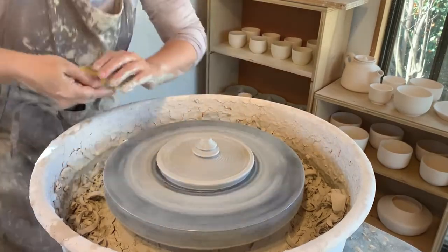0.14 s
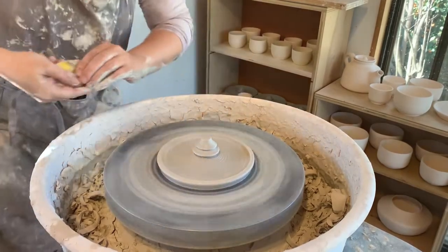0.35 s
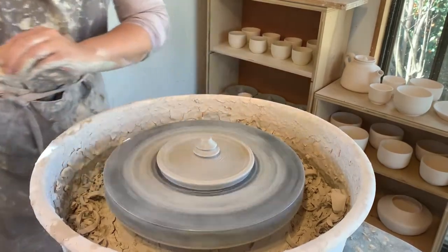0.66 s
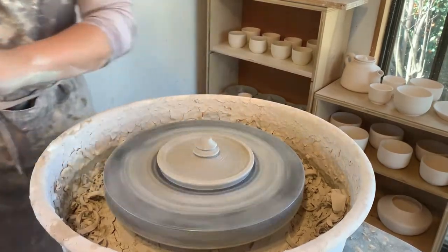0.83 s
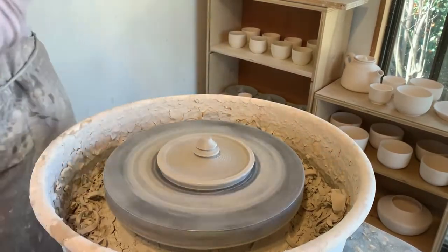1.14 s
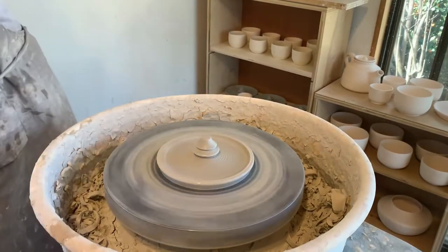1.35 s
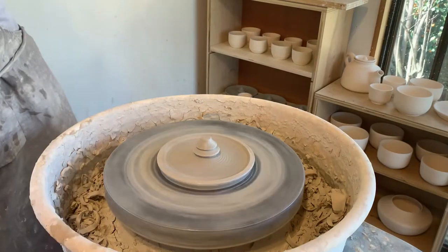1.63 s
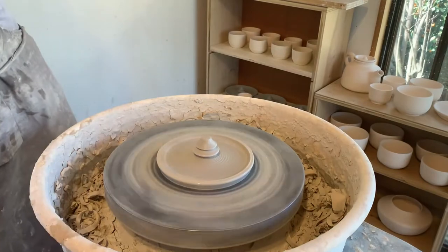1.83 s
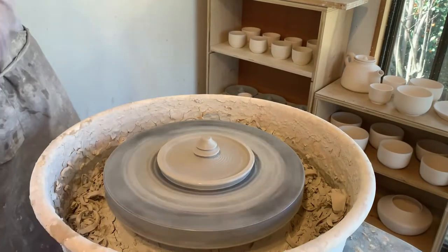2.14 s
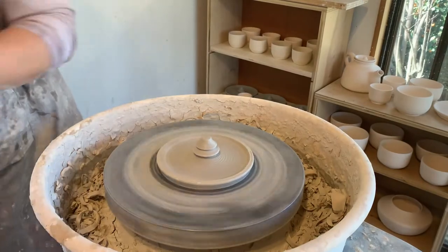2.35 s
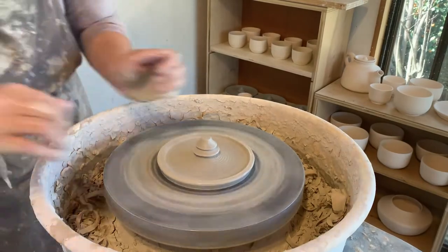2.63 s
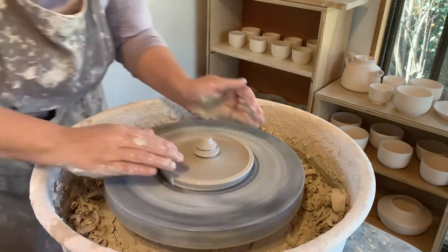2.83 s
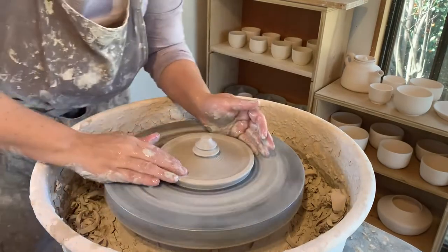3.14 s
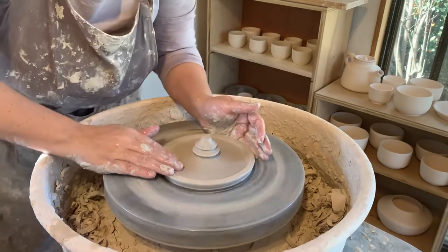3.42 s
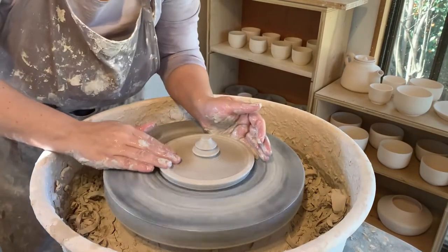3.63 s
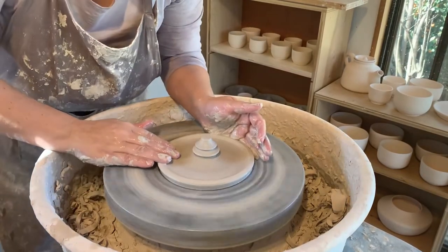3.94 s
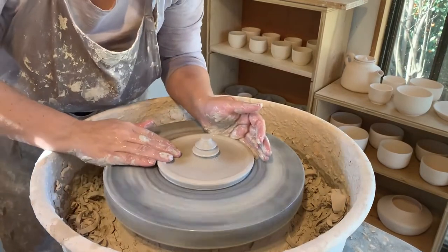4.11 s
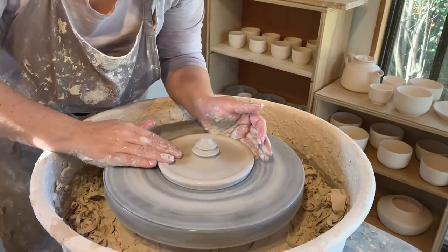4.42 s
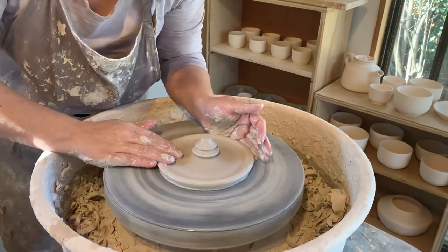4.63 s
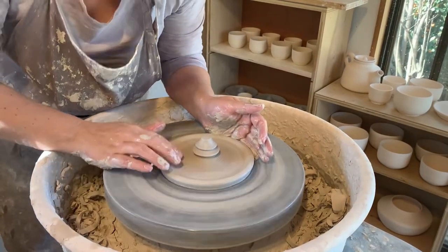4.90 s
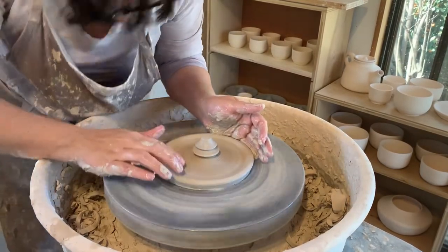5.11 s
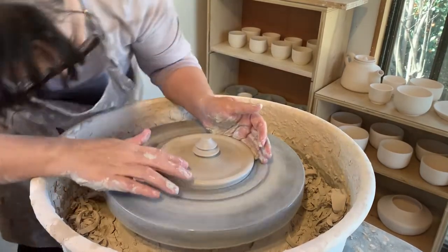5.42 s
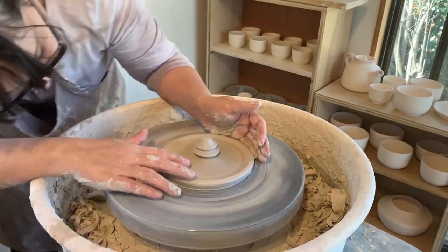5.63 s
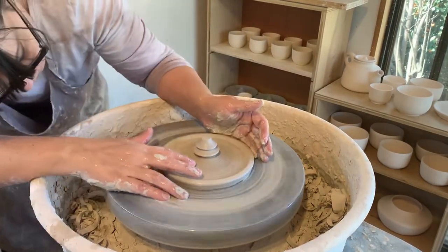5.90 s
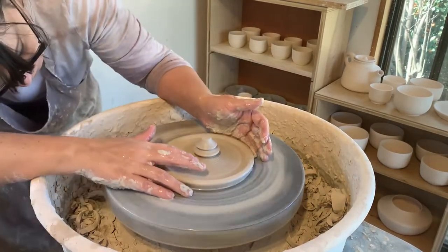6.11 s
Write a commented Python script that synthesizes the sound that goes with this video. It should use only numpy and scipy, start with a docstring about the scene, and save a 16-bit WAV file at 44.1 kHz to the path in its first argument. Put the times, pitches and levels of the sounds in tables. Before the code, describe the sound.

From 0 to about 6.3 seconds an electric pottery wheel runs without stopping in a small, fairly dry studio, heard close in stereo and slightly heavier on the left. A low motor hum near 120 Hz carries a rough drone that flutters about nine times a second, with dull rattling whirr in the low mids. Soft uneven bearing rush, thin high hiss and faint steady whines lie over it. A breathy whistle near 3 kHz swells around 0.3, 0.8, 1.8 and 2.1 seconds, most clearly at 2.7, then weakly at 3.5 and again at 4.8. A barely audible tick comes at 1.1; small knocks and clicks with short damped rings cluster from 1.6 to 2.0, and a sharp bright snap falls at 2.6, with a fainter tick just after. The hum sags slightly near 3.3, then the drone's upper tones grow a little stronger after 5.5. It ends still running.

```python
"""A throbbing drone comes first: an electric pottery wheel running in a small studio, heard by a stereo pair.
Its drive repeats nine times a second, giving close lines at every multiple of that rate over the motor's mains hum.
Uneven bearing rush, thin hiss and steady whines lie on top, and a breathy whistle surges at times.
The potter's few faint handling clicks are short bright snaps with damped rings and a little room."""
import sys
import numpy as np
from scipy import signal
from scipy.fft import rfft, irfft
from scipy.io import wavfile

SR = 44100
rng = np.random.default_rng(int(sys.argv[2]) if len(sys.argv) > 2 else 0)


def put_to_file(sound):
    """Save the sound as 16-bit audio at rate SR, in the file named by the first command-line argument."""
    columns = np.atleast_2d(sound).T  # one column per channel
    safe = np.clip(columns, -1, 1)
    whole_steps = np.round(safe * 32767)
    wavfile.write(sys.argv[1], SR, whole_steps.astype(np.int16))


N = 276066
TIME = np.arange(N) / SR   # s
BIN_HZ = np.arange(N // 2 + 1) * SR / N   # frequencies of a full-length spectrum

TURN_HZ, MAINS_HZ = 9.0025, 59.975

# Drive lines that beat with the strongest hum tone.
# Each row: multiple of the turning rate, time in seconds at which line and hum swell together.
BEATS = [(13, 0.23), (14, 0.123)]
# Balance of the stereo pair. Each row: frequency in Hz, left-right difference in dB.
BALANCE = [(60, 3.3), (120, 2), (240, 1.5), (480, 1), (950, 2), (1890, 2), (3770, 0.5), (7520, -1.5),
           (15000, 9)]


def from_db(db):
    """Decibels to gain."""
    return 10 ** (np.asarray(db) / 20)


def at_hz(points, hz):
    """Read a table on a log-frequency axis."""
    points = np.array(points)
    return np.interp(np.log(np.maximum(hz, 1)), np.log(points[:, 0]), points[:, 1])


def over_time(points):
    """Read a table of (seconds, value) at every sample."""
    return np.interp(TIME, *np.transpose(points))


def panned(pan_db):
    """Left and right gains for a level difference."""
    return from_db(np.array([[.5], [-.5]]) * pan_db)


def drift(rate):
    """Slow chance with a spread of 1, wandering about `rate` times a second."""
    step, size = 36, 8192   # samples between slow values, number of slow values
    hz = np.arange(size // 2 + 1) * SR / (step * size)
    smoothing = 1 / (1 + (hz / rate) ** 2) ** 2
    slow = irfft(rfft(rng.standard_normal(size)) * smoothing, size)
    return np.interp(np.arange(N) / step, np.arange(size), slow / slow.std())


def white(count):
    """Spectra of unrelated noises with unit power per Hz."""
    return rfft(rng.standard_normal((count, N))) * np.sqrt(SR / 2)


def turn_angle():
    """How far the drive is into its present turn, 0-1."""
    # The drive gains a little while it runs free and falls back under the hands.
    # Each row: time in seconds, lead over a steady turn in seconds.
    lead = [(0, -.00026), (1.2, -.0001), (3.2, .0003), (3.8, .00018), (5, -.00014), (6.2, -.00018)]
    return TURN_HZ * (TIME + over_time(lead)) % 1


def swell(depth_db):
    """A gain that peaks at one point of every turn."""
    peak_s = 0.044   # into the turn
    return from_db(depth_db * np.cos(2 * np.pi * (turn_angle() - peak_s * TURN_HZ)))


def looped(lines):
    """Play one turn, given by its lines, over and over at the speed of the drive."""
    one_turn, angle = irfft(lines), turn_angle()
    size = one_turn.shape[1]
    places = np.arange(size + 1) / size
    # the first sample is repeated at the end so that the turn closes
    channels = [np.interp(angle, places, np.append(channel, channel[0])) for channel in one_turn]
    return np.array(channels) * size / np.sqrt(2)   # a line of level 1 has rms 1


def drive(scatter_from_hz=365, scatter_width_hz=25, stereo_scatter_hz=750, uneven_db=2.0, swell_db=0.3,
          loose_db=-8, flutter_db=0.27, whirr_waver_db=1.07, direct_share=0.71):
    """Bumps, rattles and roughness repeat every turn, which gives lines at multiples of the turning rate."""
    # Lines set one by one. Each row: multiple of the turning rate, level in dB rms before balance and sway.
    single_lines = [(7, -36.4), (8, -36.2), (12, -51.6), (15, -49.8), (17, -62), (22, -44.7), (23, -40.6),
                    (24, -45.6), (25, -47.2), (26, -50), (27, -40.5), (28, -49), (29, -36), (30, -47),
                    (31, -48), (32, -41.8), (35, -40.7), (36, -48), (38, -62), (41, -52), (42, -42.7),
                    (43, -50.6), (44, -50.5), (45, -47.9), (48, -53), (55, -55.5), (58, -55.3), (67, -54.6),
                    (68, -68), (69, -54.3), (70, -55.5), (71, -56), (72, -54.2), (81, -60), (82, -62.5),
                    (88, -62.5), (104, -61), (109, -66.5), (135, -57.8), (137, -59.5), (139, -70),
                    (140, -58), (142, -63), (143, -55), (144, -59), (164, -64), (165, -63), (196, -68),
                    (200, -67.5), (202, -67), (263, -70), (266, -66), (267, -69.5), (340, -72.5),
                    (343, -73)]
    # All other lines, read from a spectrum.
    # Each row: frequency in Hz, level in dB rms per line before unevenness, balance and sway.
    line_spectrum = [(28, -75), (45, -56), (54, -60), (81, -56), (170, -56), (190, -61), (300, -49.5),
                     (335, -57), (420, -53), (440, -66), (560, -63), (700, -62), (760, -65), (820, -74),
                     (900, -70), (1000, -72), (1090, -79), (1160, -74), (1220, -64), (1290, -64),
                     (1350, -67), (1430, -72), (1580, -73), (1680, -79), (1790, -73), (1950, -83),
                     (2100, -78), (2300, -80), (2400, -72), (2490, -81), (2600, -74), (2690, -81),
                     (2770, -76), (2850, -88), (3220, -80), (3320, -87), (3450, -81), (3700, -92)]
    # Bumps of the drive. Each row: seconds into the turn, strength in dB, push +1 or pull -1.
    bump_rows = [(0.0194, -3.3, 1), (0.0291, -4.5, -1), (0.0562, -5.6, -1), (0.0602, -2.4, 1),
                 (0.0776, -2.9, 1), (0.0965, -3.6, -1)]
    # Rattles of the frame, and the beads of the motor's gear whine near 1240-1290 Hz. # Each row: seconds into
    # the turn, pitch in Hz, strength in dB.
    rattle_rows = [(.008, 700, 0), (.015, 500, -2), (.017, 1270, 0), (.027, 1290, 0), (.030, 700, -2),
                   (.038, 1280, -1), (.041, 635, 3.5), (.048, 510, 0), (.050, 790, 0), (.053, 1260, 2),
                   (.053, 385, 2), (.070, 1290, -1), (.081, 400, 3), (.082, 520, -2), (.087, 630, -1),
                   (.097, 1240, 2)]
    # Lines that a standing wave makes louder on the left.
    # Each row: multiple of the turning rate, left-right difference in dB.
    one_sided = [(31, 9), (58, 16), (144, 7)]
    # The drone's weight sways between two groups. Each row: time in seconds, level of the upper lines in dB.
    sway = [(0, -1.9), (.8, 1), (2.1, 1.9), (2.7, 0), (3.7, -2.5), (5, -2), (5.7, 3.1), (6.2, 3.5)]
    rattle_width_hz, throb_dip_s = 34, 0.044
    upper_band_hz, lower_band_hz = (365, 425), (193, 220)
    lower_follows = -0.39   # the lower lines move the opposite way, by this share

    order = np.arange(4097)
    hz = order * TURN_HZ
    chance = rng.standard_normal((4, len(hz)))

    # low lines follow the bumps; higher ones follow the rattles and blur into a whirr of uneven lines
    smear = np.clip((hz - scatter_from_hz) / scatter_width_hz, 0, 1)
    unevenness_db = uneven_db * smear * np.clip(chance[2], -2, 1.5)
    level = from_db(at_hz(line_spectrum, hz) + unevenness_db)
    level = level * (hz > line_spectrum[0][0]) * (hz < line_spectrum[-1][0])
    stereo_scatter = np.minimum(hz / stereo_scatter_hz, 1) ** 2
    pan_db = at_hz(BALANCE, hz)
    for multiple, db in single_lines:   # these reach the microphones more directly
        level[round(multiple)] = from_db(db)
        stereo_scatter[round(multiple)] *= direct_share
    for multiple, db in one_sided:
        pan_db[round(multiple)] = db
    for multiple, _ in BEATS:   # these sound with the hum
        level[round(multiple)] = 0

    bumps = sum(sign * from_db(db) * np.exp(-2j * np.pi * hz * s) for s, db, sign in bump_rows)
    rattles = 0
    for s, pitch, db in rattle_rows:
        band = np.exp(-.5 * ((hz - pitch) / rattle_width_hz) ** 2)
        rattles = rattles + from_db(db) * band * np.exp(2j * np.pi * (rng.random() - hz * s))
    roughness = from_db(loose_db) * (chance[0] + 1j * chance[3])
    phase = np.angle((1 - smear) * bumps + smear * (rattles + roughness))
    # the deepest lines swell together and cancel once a turn
    throb_phase = np.pi * order - 2 * np.pi * hz * throb_dip_s
    phase = np.where(hz < 100, throb_phase, phase)
    # short waves reach the two microphones out of step
    phase = phase + np.array([[.5], [-.5]]) * chance[1] * stereo_scatter
    lines = level * panned(pan_db) * np.exp(1j * phase)

    # two groups of lines sway against each other; the whirr above them wavers
    lower, upper = [(hz > low) & (hz < high) for low, high in (lower_band_hz, upper_band_hz)]
    whirr = hz >= upper_band_hz[1]
    sway_db = over_time(sway)
    sound = looped(lines * ~(lower | upper | whirr))
    sound += looped(lines * lower) * from_db(lower_follows * sway_db)
    sound += looped(lines * upper) * from_db(sway_db)
    sound += looped(lines * whirr) * swell(swell_db) * from_db(whirr_waver_db * drift(3.5))
    return sound * from_db(flutter_db * drift(26))


def hum(right_lag_s=-0.001, beat_db=-18):
    """Motor iron hums at multiples of the mains; its strongest tone beats with two nearby drive lines."""
    # Magnetic hum. Each row: multiple of the mains, dB relative to the hum level, left-right difference in dB.
    partials = [(2, 0, 3), (3, -26, -4.5), (4, -14.5, -10), (8, -26, 11.5), (10, -29, 0), (20, -33, 0)]
    # The hum sags as the hands settle on the wheel. Each row: time in seconds, level in dB rms before panning.
    level_rows = [(0, -34), (1.3, -32.5), (2.4, -32), (3.3, -35), (4.3, -33.5), (6.2, -33.0)]
    mic_time = TIME - np.array([[0], [right_lag_s]])   # a negative lag puts the right ahead
    tones = []
    for multiple, db, pan_db in partials:
        cycles = round(multiple) * MAINS_HZ * mic_time + rng.random()
        tones.append(from_db(db) * panned(pan_db) * np.exp(2j * np.pi * cycles))
    # each beating line is the strongest tone shifted to a multiple of the turning rate
    beating = sum(np.exp(2j * np.pi * (multiple * TURN_HZ - 2 * MAINS_HZ) * (TIME - s)) for multiple, s in BEATS)
    tone_sum = sum(tones) + tones[0] * from_db(beat_db) * beating
    return np.sqrt(2) * np.imag(tone_sum) * from_db(over_time(level_rows))


def ripple(hz, spacing_hz=14):
    """Fine random unevenness across frequency, with a spread of about 1."""
    knots = np.arange(0, 4096) * spacing_hz
    return np.interp(hz, knots, rng.standard_normal(len(knots)))


def bearings(level_db=0, grain_db=0.5, ripple_db=2.68):
    """Rolling noise, coloured by peaks and dips across frequency, with a fine grain in time."""
    # Rush before peaks and dips. Each row: frequency in Hz, density in dB per Hz.
    rush_density = [(20, -94), (42, -70), (68, -63), (95, -76), (150, -69), (300, -68.5), (550, -73),
                    (850, -75.8), (1300, -77.3), (2000, -84.4), (2900, -86.5), (4000, -88.6), (5500, -95.6),
                    (7000, -95), (9000, -110)]
    # Peaks (+) and dips (-) in the colour of the rush; some peaks blur around drive lines.
    # Each row: centre in Hz, width in Hz, strength in dB.
    colour_peaks = [(320.2, 2, 13), (343, 25, -4), (378, 5, 8), (405, 14, 4), (450, 30, -3), (484, 20, 5),
                    (525, 10, 6), (565, 20, -4), (592, 16, 8), (625, 16, 8.5), (690, 40, -3), (755, 20, 3),
                    (925, 16, 6), (1028, 24, 6), (1090, 60, -4), (1205, 36, 3.5), (1288, 14, 8),
                    (1790, 36, 5), (1855, 36, 4.5), (2405, 50, 5), (2650, 120, 2), (2860, 110, -5),
                    (3105, 80, 6), (3450, 80, 2)]
    # Likeness of the rush at the two microphones. Each row: frequency in Hz, correlation.
    likeness = [(40, 1), (130, 1), (350, 0.81), (600, 0.083), (900, 0.35), (1800, 0.15), (5000, 0.027),
                (16000, 0.017)]
    peaks = 0
    for centre, width, db in colour_peaks:
        peaks = peaks + (from_db(db) ** 2 - 1) / (1 + (2 * (BIN_HZ - centre) / width) ** 2)
    colour = from_db(at_hz(rush_density, BIN_HZ)) * np.sqrt(np.maximum(1 + peaks, .1))
    alike = np.clip(at_hz(likeness, BIN_HZ), -1, 1)
    unevenness_db = ripple_db * np.array([ripple(BIN_HZ), ripple(BIN_HZ)])
    mid, side = white(count=2) * from_db(unevenness_db)
    stereo = (np.sqrt(1 + alike) * mid + np.sqrt(1 - alike) * side * [[1], [-1]]) / np.sqrt(2)
    rush = irfft(stereo * colour * panned(at_hz(BALANCE, BIN_HZ)), N)
    return rush * from_db(level_db + grain_db * drift(100))


def hiss(diffuse_db=-12, left_lag_s=.000182):
    """Motor hiss comes straight from one side, later at the left microphone, with a weaker diffuse part."""
    # Thin hiss of the motor, direct part. Each row: frequency in Hz, density in dB per Hz.
    hiss_density = [(4000, -115), (6600, -99), (7900, -104), (8900, -102), (9650, -90.5), (10200, -98),
                    (10750, -104), (11400, -100), (12800, -102), (15800, -103)]
    delay = np.exp(-2j * np.pi * BIN_HZ * np.array([[left_lag_s], [0]]))
    direct = white(count=1) * delay
    diffuse = from_db(diffuse_db) * white(count=2)
    return irfft((direct + diffuse) * from_db(at_hz(hiss_density, BIN_HZ)), N)


def wandering_tone(hz, width_hz, lag_s=0.00022):
    """A narrow tone of rms 1 whose pitch wanders, reaching one microphone a little later."""
    wander = np.cumsum(width_hz / 2 * drift(18.4)) / SR   # cycles
    mic_time = TIME - np.array([[0], [lag_s * rng.uniform(-0.84, 1)]])
    return np.sqrt(2) * np.sin(2 * np.pi * (hz * mic_time + wander))


def whistle(flutter_rate):
    """A narrow band of noise, breathy and fluttering, that surges now and then."""
    # Surges, each rising and falling like a bell. Each row: time of the top in seconds, rise in dB.
    surges = [(0.33, 8), (0.77, 9), (1.75, 7.5), (2.08, 8.5), (2.72, 13), (3.52, 3), (4.82, 7)]
    centre_hz, width_hz, surge_width_s = 3140, 12, .11
    resting_db, flutter_depth_db = -68, 2
    surge_db = sum(db * np.exp(-.5 * ((TIME - s) / surge_width_s) ** 2) for s, db in surges)
    flutter_db = flutter_depth_db * np.minimum(drift(flutter_rate), 2)
    noise = white(count=1) + white(count=2)   # partly shared by left and right
    narrow = irfft(noise / (1 + ((BIN_HZ - centre_hz) / width_hz) ** 2), N)
    return from_db(resting_db + surge_db + flutter_db) * narrow / narrow.std()


def whine(swell_db=2.1, flutter_rate=14):
    """The whistle above the motor's thin tones, each of which swells on its own."""
    # Thin tones of the motor. Each row: pitch in Hz, width in Hz, level in dB rms before swelling.
    whines = [(191.9, .3, -54), (238.7, .3, -56), (311.9, .3, -58), (318.6, .3, -50.5), (374.5, .3, -56),
              (649.7, .5, -56.5), (1577.9, .5, -68.5), (1817, 1.5, -66), (2394, 2, -70), (3155.6, 1.5, -68),
              (6330, 25, -74)]
    sound = whistle(flutter_rate)
    for pitch, width_hz, db in whines:
        sound = sound + from_db(db + swell_db * drift(5.5)) * wandering_tone(pitch, width_hz)
    return sound


def clicks(snap_s=0.0017, snap_hz=4500, spread=0.062, room_db=-18, room_t60=.15, pan_db=2):
    """Each touch is a short bright snap and a cluster of three damped modes, with a little room after it."""
    # Handling clicks. Each row: start in seconds, level in dB before room and panning, pitch in Hz,
    # ring t60 in seconds, bright snap in dB relative to the ring.
    touches = [(1.142, -51, 12100, .008, 0), (1.619, -33, 1920, 0.096, -22), (1.672, -42, 4170, .04, -15),
               (1.736, -28.5, 2230, 0.045, -6), (1.736, -40, 4800, 0.026, -11),
               (1.868, -43, 3580, .03, -15), (1.929, -39, 2270, .04, -18), (1.948, -35.5, 1860, 0.095, -18),
               (1.971, -42, 7000, .018, -9), (1.974, -39.5, 4800, 0.031, -8),
               (1.974, -41, 3220, 0.033, -15), (2.012, -50, 7200, .03, -8),
               (2.641, -31.5, 11400, 0.011, -9), (2.758, -51, 14500, .01, -3)]
    out = np.zeros((2, N))
    t = TIME[:SR // 4]
    bright = signal.butter(1, snap_hz, "high", fs=SR, output="sos")
    for s, db, hz, t60, snap_db in touches:
        modes_hz = hz * (1 + spread * np.array([[-1], [0], [.5]]))
        ring = np.sin(2 * np.pi * modes_hz * t).mean(axis=0) * np.exp(-np.log(1000) * t / t60)
        burst = rng.standard_normal(len(t)) * np.exp(-t / snap_s)
        snap = signal.sosfilt(bright, burst) / 2
        touch = from_db(db) * (ring + from_db(snap_db) * snap)
        room = rng.standard_normal((2, len(t))) * np.exp(-np.log(1000) * t / room_t60)
        room = room / np.linalg.norm(room[0])
        echo = signal.fftconvolve(room, touch[None], axes=1)[:, :len(t)]
        start = round(s * SR)
        out[:, start:start + len(t)] += touch + from_db(room_db) * echo
    return out * panned(pan_db)


def scene(rush_waver_db=0.52, rush_swell_db=0.53, hiss_waver_db=1.0):
    """The running wheel and the potter's small noises."""
    rush = bearings() * swell(rush_swell_db) * from_db(rush_waver_db * drift(7.8))
    wavering_hiss = hiss() * from_db(hiss_waver_db * drift(33))
    return drive() + hum() + rush + wavering_hiss + whine() + clicks()


def record(dry):
    """The top is cut steeply by an elliptic low-pass."""
    cutoff_hz = 15900
    low_pass = signal.ellip(10, .1, 80, cutoff_hz, fs=SR, output="sos")
    return signal.sosfilt(low_pass, dry)


dry = scene()
out = record(dry)
put_to_file(out)
```